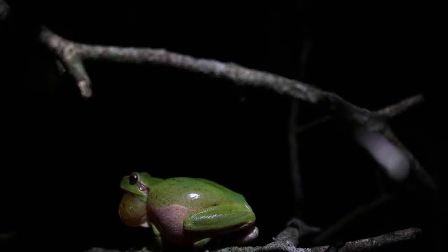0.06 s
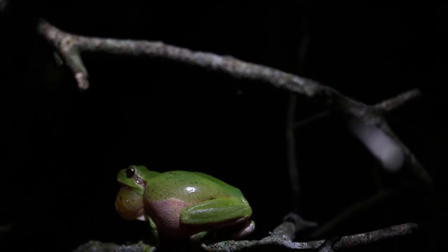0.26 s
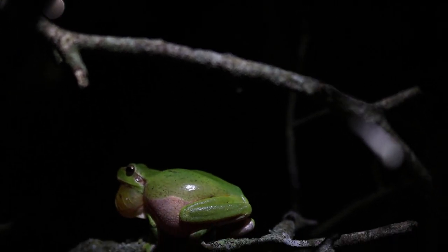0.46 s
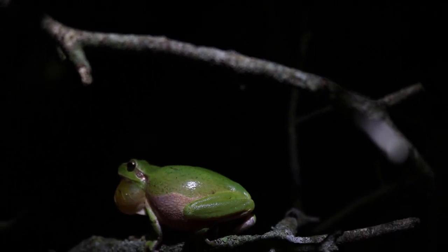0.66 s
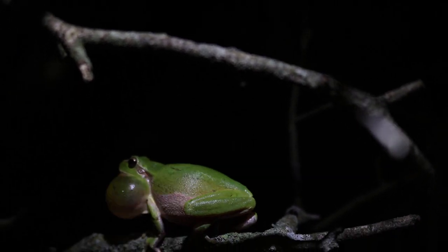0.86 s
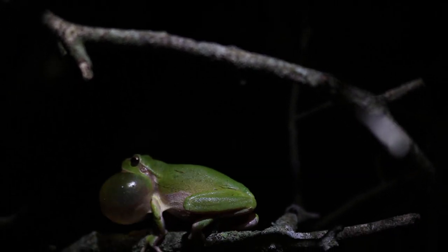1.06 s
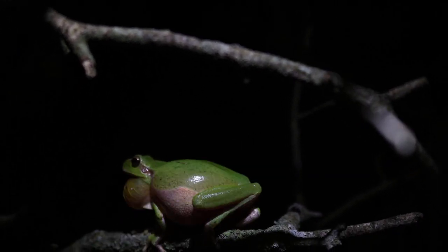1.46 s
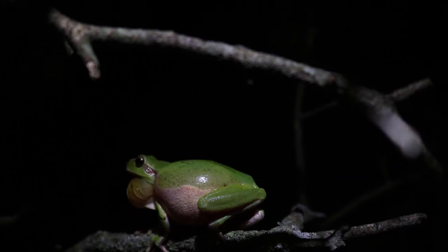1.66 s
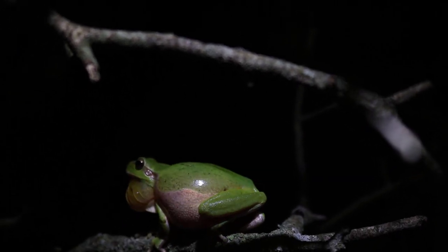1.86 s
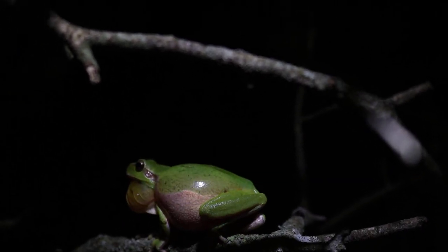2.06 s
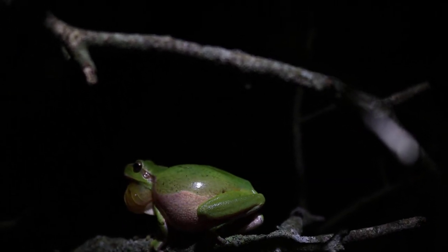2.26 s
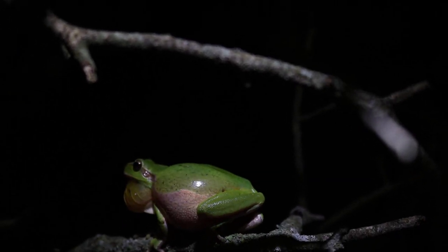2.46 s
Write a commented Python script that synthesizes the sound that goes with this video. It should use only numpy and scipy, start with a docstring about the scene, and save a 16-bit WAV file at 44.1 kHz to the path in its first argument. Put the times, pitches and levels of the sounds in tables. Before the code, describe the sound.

A tree frog croaks loudly beside a stereo microphone among plants at night, with other frogs calling before and after it. The rasping, pulsing calls rise slightly and overlap, over faint early clicks and a quiet, far-off chorus.

```python
"""Among plants at night: tree frogs call, one close to a stereo microphone, others around it, overlapping.
A croak is a train of about 90 pulses a second that slows as the frog's air runs out. Each pulse rings
a low tone and a stronger upper tone that climbs as the vocal sac fills. Plants scatter the calls.
Faint high ticks sound nearby, over still air and a distant chorus."""
import sys
import numpy as np
from scipy import signal
from scipy.fft import rfft, irfft, next_fast_len
from scipy.io import wavfile
from scipy.ndimage import uniform_filter1d

SR = 44100
rng = np.random.default_rng(int(sys.argv[2]) if len(sys.argv) > 2 else 0)


def wrap_up_sound(samples):
    """Save the sound to the file named by the first command line argument, as 16-bit audio."""
    columns = np.atleast_2d(samples).T
    # keep every value between -1 and 1, then stretch to whole-number steps
    tamed = np.clip(columns, -1, 1)
    steps = np.round(tamed * 32767).astype(np.int16)
    wavfile.write(sys.argv[1], SR, steps)


N = 114660


def amp(db):
    """Decibels to gain."""
    return 10 ** (np.asarray(db) / 20)


def unit(x):
    """Scale to rms 1."""
    return x / np.sqrt(np.mean(x ** 2) + 1e-20)


def filtered(x, response):
    """Filter x by a gain given as a function of frequency."""
    size = next_fast_len(N + 8192)
    return irfft(rfft(x, size) * response(np.fft.rfftfreq(size, 1 / SR)), size)[..., :N]


def noise(colour):
    """Noise of rms 1 coloured by (frequency [Hz], level [dB]) points."""
    points_hz, db = np.transpose(colour)
    response = lambda hz: amp(np.interp(np.log(hz + 1), np.log(points_hz), db))
    return unit(filtered(rng.standard_normal(N), response))


# Spectrum of the air and the far frogs (frequency [Hz], relative level [dB])
NIGHT_COLOUR = [(25, -2), (60, -24), (120, -5.5), (260, 0), (480, -7), (700, -3), (1100, 0), (1500, 7),
                (2200, 20), (3000, -17), (5000, -10), (8000, -15), (12000, -16.5), (16000, -28.5)]


def night_air(mid_db=-48.5, side_re_mid_db=-4.5):
    """Still air and a distant chorus blend into a quiet, steady bed all around the microphone."""
    mid = noise(NIGHT_COLOUR)
    side = amp(side_re_mid_db) * noise(NIGHT_COLOUR)
    return amp(mid_db) * np.array([mid + side, mid - side])


# Faint ticks nearby (time [s], relative level [dB])
TICK_EVENTS = [(.0408, -53.5), (.0525, -52), (.0825, -62), (0.102, -47.5), (0.131, -51), (0.15, -47),
               (0.178, -54.5), (.1945, -46), (0.269, -43.5), (.32, -45), (.349, -43), (.66, -45),
               (.668, -56)]
# Their spectrum (frequency [Hz], relative level [dB])
TICK_COLOUR = [(3000, -23), (6000, -16), (9000, -13), (11500, -9.5), (14000, -21.5), (16000, -9.5)]


def ticks(click_s=.0012, sizzle_s=.012, sizzle_db=-16.5, gain_db=6.5):
    """Tiny dry clicks high in the treble, each leaving a brief sizzle."""
    t, envelope = np.arange(N) / SR, np.zeros(N)
    for start, db in TICK_EVENTS:
        age = np.abs(t - start)
        decay = np.exp(-age / click_s) + amp(sizzle_db) * np.exp(-age / sizzle_s)
        envelope += amp(db) * (t >= start) * decay
    return amp(gain_db) * envelope * np.array([noise(TICK_COLOUR), noise(TICK_COLOUR)])


def plant_scatter(x, leaves_t60_s=.027, trunks_t60_s=.13, trunks_db=-1.5):
    """Leaves and trunks return a quick smear and a faint tail, different in each channel."""
    t = np.arange(SR // 3) / SR
    decays = amp(-60 * t / np.array([[[leaves_t60_s]], [[trunks_t60_s]]]))
    echoes = rng.standard_normal((2, 2, len(t))) * decays * (t > .002)
    leaves, trunks = echoes / np.linalg.norm(echoes, axis=-1, keepdims=True)
    return signal.fftconvolve(x[None], leaves + amp(trunks_db) * trunks, axes=1)[:, :N]


# Whistles high above the croaks
# (start [s], end [s], start pitch [Hz], end pitch [Hz], relative level [dB])
WHISTLE_GLIDES = [(.92, 1.16, 8150, 6900, -28), (1.58, 1.82, 8100, 6300, -31), (1.62, 2.0, 5500, 6100, -30),
                  (.04, .22, 6000, 6300, -30), (1.0, 1.16, 14700, 12900, -54),
                  (1.06, 1.32, 11900, 10300, -52), (1.66, 1.86, 14800, 12900, -51),
                  (1.8, 2.0, 13000, 11700, -42), (2.08, 2.38, 11900, 9800, -42),
                  (2.16, 2.36, 12600, 10900, -46), (.37, .66, 13000, 10400, -45)]


def whistles(pulse_envelope, wander_hz=130, gain_db=-1):
    """Thin tones that glide, mostly downward, and beat with the frogs' pulses."""
    t, tones = np.arange(N) / SR, np.zeros(N)
    for start, end, start_hz, end_hz, db in WHISTLE_GLIDES:
        progress = np.clip((t - start) / (end - start), 0, 1)
        wander = wander_hz * unit(uniform_filter1d(rng.standard_normal(N), size=50))
        hz = start_hz + (end_hz - start_hz) * progress + wander
        fade = np.sqrt(np.abs(np.sin(np.pi * progress)))
        tones += amp(db) * fade * np.sin(2 * np.pi * np.cumsum(hz) / SR)
    return amp(gain_db) * tones * pulse_envelope


def vocal_sac(hz, bottom_hz=959, top_hz=2850):
    """The small vocal sac radiates only a band of middle frequencies."""
    highpass = signal.freqs(*signal.butter(7, bottom_hz, 'high', analog=True), hz)[1]
    lowpass = signal.freqs(*signal.butter(6, top_hz, 'low', analog=True), hz)[1]
    return highpass * lowpass


def swell(age, rise_ms):
    """A pulse that peaks at 1 after its rise time and dies away."""
    rises = age * 1e3 / rise_ms
    return (rises * np.exp(1 - rises)) ** 1.42


def pulse_times(start, end, first_spacing_ms, slowing_ms=1.8, last_drag_ms=2.5):
    """The pulses slow as the frog's air runs out, and the last few drag."""
    clock = np.arange(start, end, 1 / SR)
    spent = (clock - start) / (end - start)
    spacing_ms = first_spacing_ms + slowing_ms * spent ** 2 + last_drag_ms * spent ** 16
    count = np.cumsum(1e3 / spacing_ms) / SR
    return np.interp(np.arange(int(count[-1]) + 1), count, clock)


# Overtones of a pulse (ratio to the upper tone, relative level [dB])
OVERTONES = [(1.421, -31.5), (1.899, -45), (2.5, -42.5)]
# Spectrum of its rasp (frequency [Hz], relative level [dB])
RASP_COLOUR = [(400, -38), (900, -5.5), (1500, -3.5), (2500, -2), (3300, -0.5), (4300, -7), (5000, -14),
               (5800, -14), (6700, -13.5), (7800, -4.5), (9200, -29), (12500, -32), (15500, -42)]


def croak(contour, pace, low_hz, upper_rise_ms, low_rise_ms, rasp_db):
    """Each pulse rings two tones in the sac, with overtones and rasp; returns sound and envelope."""
    jitter_s, spread_db, upper_spread, low_spread = .00005, 1.07, .007, .025  # from pulse to pulse
    chirp, chirp_s = .06, .00067  # the tones start sharp and settle within a pulse
    times, upper_hz, upper_db, low_db = np.transpose(contour)
    onsets = pulse_times(*pace)[:, None]  # one row per pulse
    jitter, detune, upper_luck, low_luck = rng.standard_normal((80, 4))[:len(onsets)].T[..., None]
    samples = (onsets * SR).astype(int) + np.arange(SR // 40)
    age = np.maximum(samples / SR - onsets - jitter_s * jitter, 0)
    per_pulse = lambda column: np.interp(onsets, times, column)
    train = lambda pulses: np.bincount(samples.ravel(), pulses.ravel(), N)[:N]

    phase_per_hz = 2 * np.pi * (age + chirp * chirp_s * (1 - np.exp(-age / chirp_s)))
    upper_phase = phase_per_hz * per_pulse(upper_hz) * (1 + upper_spread * detune)
    low_phase = phase_per_hz * low_hz * (1 + low_spread * detune)
    upper_gain = amp(per_pulse(upper_db) + spread_db * upper_luck)
    low_gain = amp(per_pulse(low_db) + spread_db * low_luck)
    burst = upper_gain * swell(age, upper_rise_ms)
    after_ring = upper_gain * amp(-30.5) * swell(age, rise_ms=14)  # the sac rings on between pulses
    upper = (burst + after_ring) * np.sin(upper_phase)
    low = low_gain * swell(age, low_rise_ms) * np.sin(low_phase)
    tones = filtered(train(upper + low), vocal_sac)

    # The rasp snaps open; most of it repeats from pulse to pulse, the rest is new.
    envelope, grain = train(burst), noise(RASP_COLOUR)
    repeated = np.interp(age, np.arange(N) / SR, grain)
    snap = upper_gain * swell(age, rise_ms=.9)
    rasp = train(snap * repeated) + amp(-7) * envelope * grain
    overtones = burst * sum(amp(db) * np.sin(ratio * upper_phase) for ratio, db in OVERTONES)
    bass_cut = lambda hz, corner_hz=770: 1 - 1 / (1 + (hz / corner_hz) ** 8)
    edge = filtered(train(overtones) + amp(rasp_db) * rasp, bass_cut)
    return tones + edge, envelope


# The course of each croak; CLOSE is the frog beside the microphone
# (time [s], upper tone [Hz], relative upper level [dB], relative low level [dB])
OPENING = [(.02, 1960, -29.5, -45), (.046, 1940, -70, -64), (.053, 2090, -23, -48), (.12, 2050, -26, -46),
           (.2, 2140, -19, -33.5), (.3, 2222, -11.5, -21), (.47, 2350, -19, -24.5), (.6, 2380, -22, -24.5)]
LOW_VOICE = [(.13, 1780, -44, -43.5), (.22, 1940, -21, -23.5), (.33, 2200, -17.5, -21),
             (.45, 2410, -15.5, -20), (.62, 2480, -19.5, -20), (.655, 2310, -28, -35.5),
             (.685, 2380, -35, -52)]
CLOSE = [(.74, 1720, -25.5, -22.5), (.765, 1810, -10, -13.5), (.806, 1935, -3.5, -12.5),
         (.85, 2036, -2.5, -9), (.96, 2226, -4, -13), (1.04, 2350, -6, -16), (1.14, 2343, -10, -19),
         (1.158, 2370, -16.5, -12.5)]
LEFT = [(.688, 1990, -26, -42), (.85, 2160, -23, -33), (1.05, 2270, -15.5, -27), (1.18, 2274, -13.5, -24.5),
        (1.3, 2156, -13.5, -21.5), (1.335, 2080, -45, -50)]
CREAK = [(1.245, 2830, -38, -48), (1.285, 2700, -22.5, -30), (1.32, 2540, -19.5, -30),
         (1.345, 2570, -56, -30)]
CENTRE = [(1.88, 1890, -26.5, -42), (2.06, 2230, -32.5, -23.5), (2.24, 2460, -13, -25.5),
          (2.36, 2180, -38, -36)]
FAR = [(1.304, 2120, -35, -49), (1.38, 2222, -28.5, -51), (1.53, 2332, -27, -34.5),
       (1.75, 2200, -19.5, -93)]
NEAR = [(1.482, 1870, -41, -46.5), (1.56, 2026, -20.5, -28.5), (1.65, 2136, -13.5, -20),
        (1.73, 2201, -14, -20), (1.83, 2294, -13.5, -18.5), (1.94, 2353, -14.5, -19.5),
        (2.005, 2430, -24.5, -20)]
RIGHT = [(1.925, 1950, -22, -25.5), (2.0, 2174, -14.5, -23), (2.11, 2270, -8.5, -19.5),
         (2.22, 2352, -9.5, -21), (2.338, 2360, -12, -20)]  # reaches the right channel first, though a little louder on the left
LATE = [(1.98, 1970, -21.5, -22.5), (2.1, 2260, -17.5, -22.5), (2.25, 2350, -20, -21),
        (2.35, 2340, -17.5, -27), (2.52, 2360, -24, -33), (2.56, 2320, -25, -36.5)]
CLOSING = [(2.4, 1910, -36, -54), (2.49, 1970, -27.5, -45), (2.6, 2196, -22, -52)]
# Each croak's voice and its place around the microphone (contour, low tone [Hz], upper rise [ms],
# low rise [ms], rasp [dB], left over right [dB], left lead [ms], scatter [dB, capped at 0], gain [dB])
CROAKS = [ (OPENING, 1173, 1.47, 0.77, -35, -0.44, 0.022, -0.5, 0),
          (LOW_VOICE, 1058.6, 0.88, 2.47, -17, -2.7, -0.091, 1.6, 1),
          (CLOSE, 1141, 1.14, 1.12, -26, -1.6, 0.027, -9.5, 0),
          (LEFT, 1064, 1.14, 3, -25.5, 2.4, 0.21, -4, 0), (CREAK, 820, 1, 1.4, -27.5, 4.3, 0.24, -11.5, 0),
          (CENTRE, 1408, 1.5, 2.2, -21.5, 0, -0.0016, -2.5, 0), (FAR, 1114, 1.9, 1.2, -55, 0, 0, -6, 0),
          (NEAR, 1140, 2.1, 1.9, -20, -3, -.01, -8, 0), (RIGHT, 984, 1.52, 2.2, -26.5, 1.8, -0.11, -0.5, 0),
          (LATE, 1114, 0.8, 0.99, -21, -5, -0.17, -2, 0),
          (CLOSING, 1300, 1.44, 1.4, -27.5, 0, .03, -13.5, 0)]
# Their pulsing, in the same order (start [s], end [s], first pulse spacing [ms])
CROAK_PACES = [(.0205, .6, 10.9), (.13, .685, 10.65), (.7402, 1.158, 10.8), (.688, 1.335, 10.4),
               (1.245, 1.345, 12.5), (1.88, 2.36, 11.2), (1.304, 1.75, 10.15), (1.482, 2.005, 11.15),
               (1.925, 2.338, 10.95), (1.98, 2.56, 10.9), (2.3995, 2.9, 10.95)]


def tree_frogs(whistle_scatter_db=-3.5):
    """Each croak reaches the microphone from its own direction, directly and by way of the plants."""
    calls, pulse_envelope = np.zeros((2, N)), np.zeros(N)
    sides = np.array([[.5], [-.5]])  # left, right
    for (contour, *timbre, pan_db, lead_ms, scatter_db, gain_db), pace in zip(CROAKS, CROAK_PACES):
        voice, envelope = croak(contour, pace, *timbre)
        direct = filtered(voice, lambda hz: np.exp(2j * np.pi * hz * sides * lead_ms / 1e3))
        wet = amp(min(scatter_db, 0))
        arriving = (direct + wet * plant_scatter(voice)) / np.hypot(1, wet)
        calls += amp(gain_db + sides * pan_db) * arriving
        pulse_envelope += envelope
    whistling = whistles(pulse_envelope)
    return calls + whistling + amp(whistle_scatter_db) * plant_scatter(whistling)


def scene():
    """Frogs in front, faint ticks nearby, night air in the distance."""
    return tree_frogs() + ticks() + night_air()


def record(dry, bend=.012, top_hz=15800):
    """The microphone bends loud pulses slightly to one side and keeps nothing above its band limit."""
    return filtered(dry + bend * dry ** 2, lambda hz: hz < top_hz)


dry = scene()
out = record(dry)
wrap_up_sound(out)
```